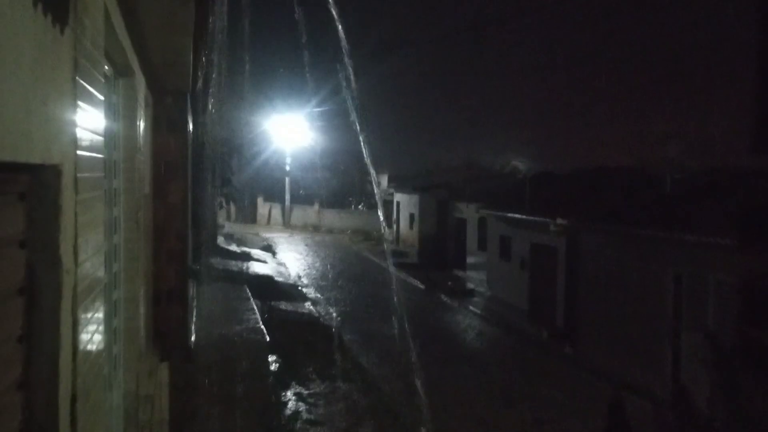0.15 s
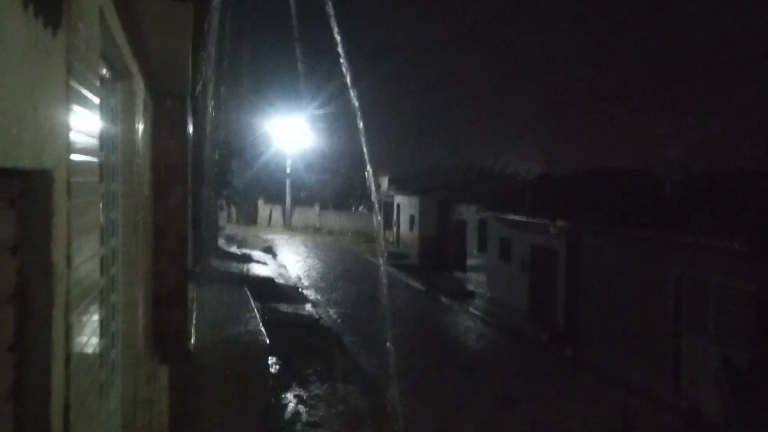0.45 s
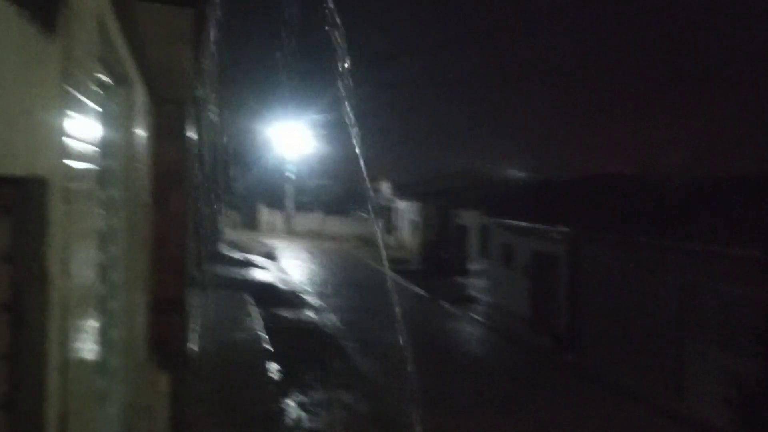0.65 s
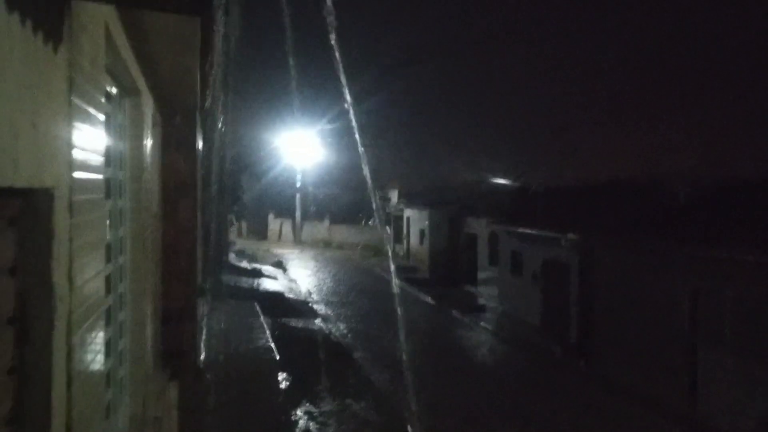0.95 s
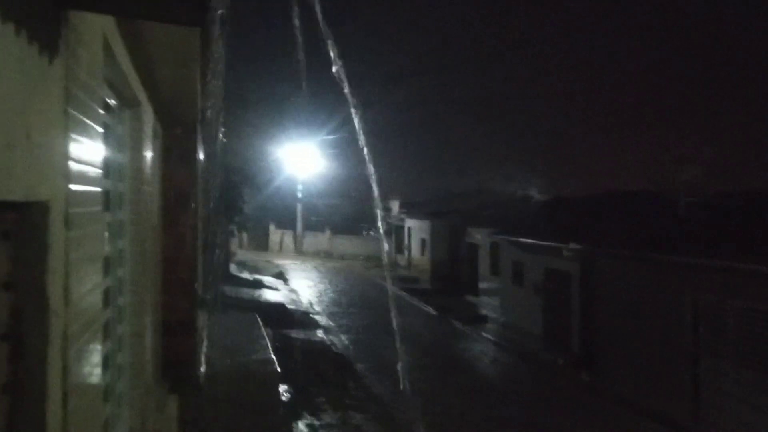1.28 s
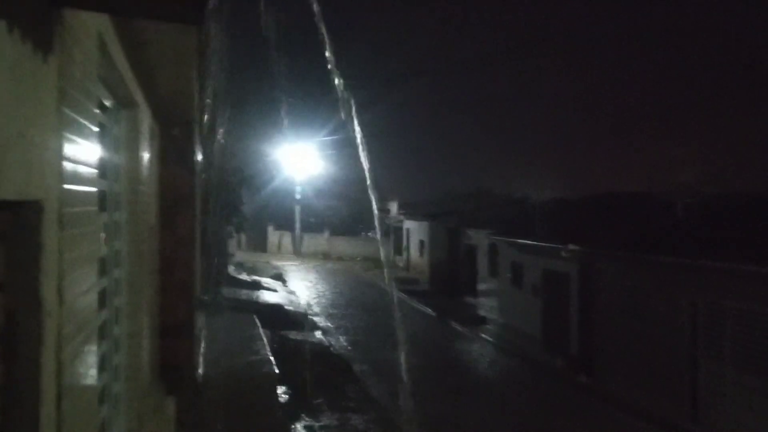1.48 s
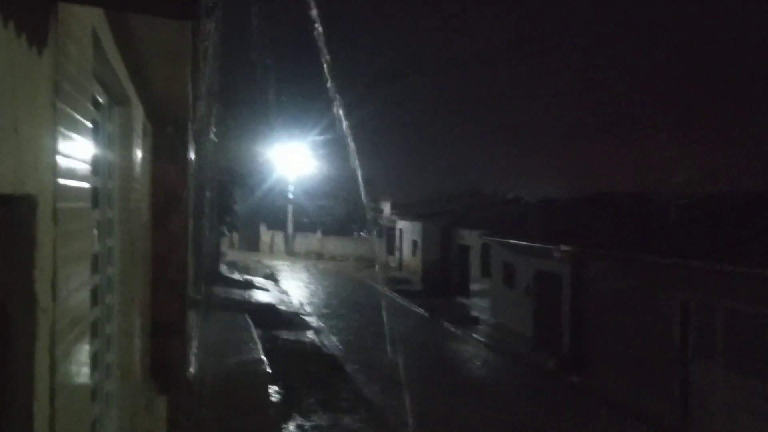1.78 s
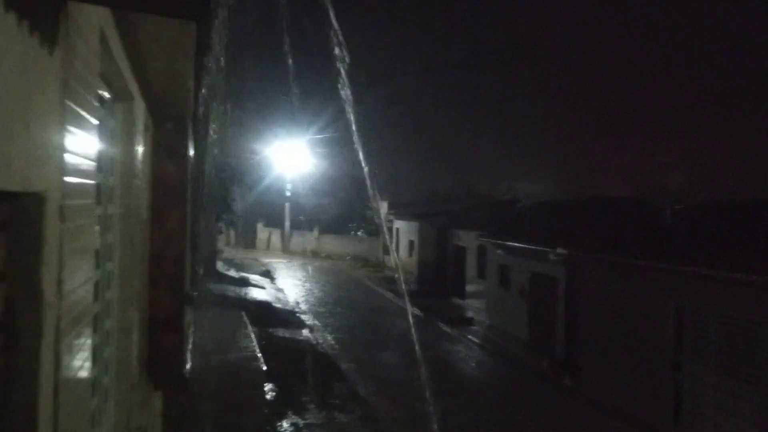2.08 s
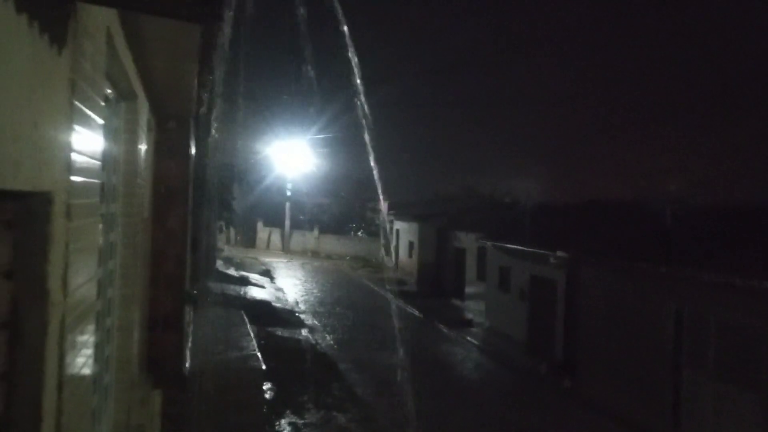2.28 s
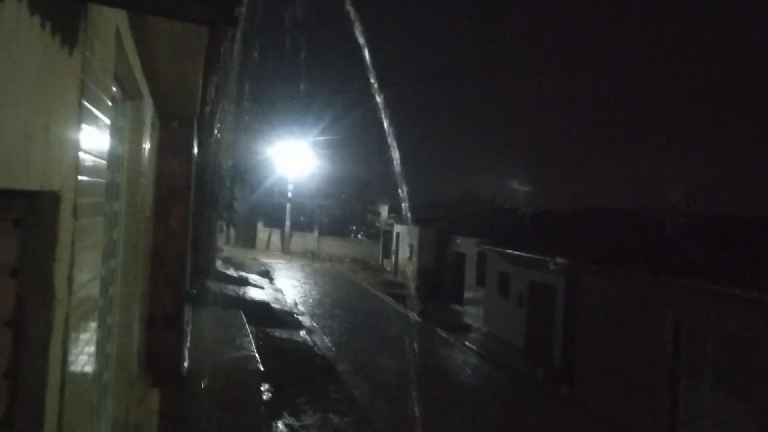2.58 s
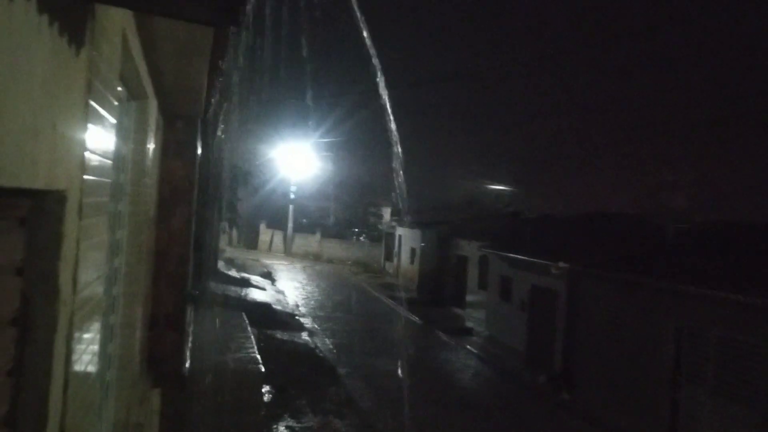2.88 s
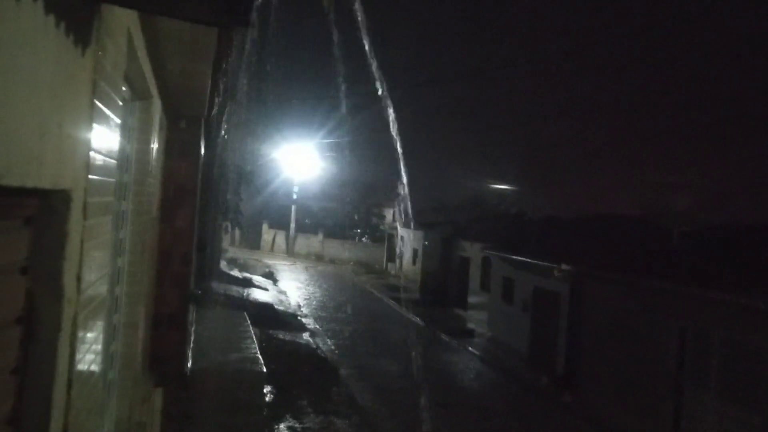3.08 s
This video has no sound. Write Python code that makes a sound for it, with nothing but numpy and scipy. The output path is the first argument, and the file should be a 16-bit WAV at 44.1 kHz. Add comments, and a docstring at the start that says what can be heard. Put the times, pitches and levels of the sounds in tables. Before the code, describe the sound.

Steady heavy rain falls on a street, heard from under a roof edge where runoff spatters on the pavement. Then wind buffets the microphone, stray drops click on its housing, and a thin stream hisses faintly.

```python
"""A paved street at night in heavy rain, the microphone under the edge of a roof.
Far drops merge into a wash and nearer ones patter and ping. Close by, water pours off the eaves
and bursts into spray; one stream lands with a slowly rising hiss. After a second, gusts buffet
the microphone and blow single drops against its housing."""
import sys
import numpy as np
from scipy import signal
from scipy.fft import rfft, irfft, next_fast_len
from scipy.io import wavfile
from scipy.ndimage import uniform_filter1d, map_coordinates

SR = 44100
rng = np.random.default_rng(int(sys.argv[2]) if len(sys.argv) > 2 else 0)


def transcribe(u):
    """Save the signal u as a 16-bit wav file named by the first command-line argument.

    u: samples, shape (n,) or (channels, n), limited to [-1, 1]; the rate is SR.
    q: integer samples, one column per channel.
    """
    v = np.clip(np.atleast_2d(u).T, -1, 1)
    q = np.round(v * 32767).astype(np.int16)
    wavfile.write(sys.argv[1], SR, q)


N = 143325

# Colour of the far wash: freq_hz, level_db
WASH_SPECTRUM = [(60, -19), (200, -10), (350, -7), (550, -2), (800, 2), (1700, 0.7), (2400, -2.5),
                 (3300, -3), (4400, 0), (5500, -2), (8500, -3.5), (15500, -7)]
# Swell of the rain in the street, far and near together: time_s, level_db
RAIN_LEVEL = [(.27, -45), (.45, -41.5), (.8, -41.5), (1.5, -40.5), (1.95, -41.5), (2.45, -41.5),
              (3.25, -43)]
# Low murmur of rain on the roofs: freq_hz, level_db
ROOFS, ROOFS_DB = [(25, -11), (62, -3.5), (100, -12), (160, -15.5), (300, -17.5), (600, -31.5)], -52.5

def rain():
    """Far drops merge into a wash, nearer ones patter on top, and the roofs murmur underneath."""
    wash = coloured(patchy(depth_db=1.5), WASH_SPECTRUM)
    drops = patter(count=2000, centre_hz=2730, spread=0.571, ring_cycles=9.6, scatter_db=3)
    spatter = patter(count=8000, centre_hz=8130, spread=0.32, ring_cycles=18, scatter_db=6)
    ticks = patter(count=170, centre_hz=6500, spread=0.25, ring_cycles=9, scatter_db=1.5)
    clumps = amp(2 * np.minimum(wobble(60), 1.5))
    flurries = amp(1.2 * wobble(25))
    near = amp(-15.5) * flurries * drops + amp(-9) * clumps * spatter + amp(-16) * ticks
    swell = amp(curve(RAIN_LEVEL) + 0.17 * wobble(6.11))
    roofs = amp(ROOFS_DB) * coloured(rng.standard_normal(N), ROOFS)
    return swell * (amp(-2.5) * wash + near) + roofs


def patter(count, centre_hz, spread, ring_cycles, scatter_db):
    """Near droplets land at random, each a damped ring that falls 60 dB in ring_cycles."""
    starts = (rng.random(count) * N).astype(int)[:, None]
    sizes = np.minimum(rng.exponential(size=count), np.log(60))[:, None]
    detune = spread * np.clip(rng.standard_normal(count), -2, 2)
    pitch_hz = np.clip(centre_hz * np.exp(detune), 400, 18000)[:, None]
    samples = np.arange(256)
    cycles = pitch_hz * samples / SR
    envelope = (1 - np.exp(-cycles / 2)) * amp(-60 * cycles / ring_cycles)
    rings = amp(scatter_db * sizes) * np.sqrt(pitch_hz) * envelope * np.sin(2 * np.pi * cycles)
    return unit(np.bincount((starts + samples).ravel(), rings.ravel(), N)[:N])


# Runoff hitting the pavement close by: start_s, level_db, centre_hz, width_octaves, t60_s
EAVES_SPLASHES = [(.3635, -26.5, 7450, 0.87, 0.037), (0.414, -26.5, 8650, 0.37, .05),
                  (.514, -27.5, 5300, 0.48, 0.048), (0.5409, -30.5, 6050, 0.76, 0.047),
                  (.712, -33.5, 2000, 2.2, 0.1), (0.9371, -30.5, 5800, 1.2, 0.031),
                  (0.957, -31, 9000, .45, 0.036), (1.147, -37.5, 3700, 1, 0.15),
                  (1.164, -31, 7250, 1.2, 0.029), (1.424, -33.5, 4160, 0.7, .12),
                  (1.514, -35, 4750, 1, 0.12), (1.565, -39, 4160, 0.31, 0.34),
                  (1.737, -34, 3140, 1.0, 0.23), (2.085, -34, 4300, 1.1, 0.11),
                  (2.114, -33.5, 3850, 2.2, 0.17), (2.244, -35.5, 3670, 0.39, .057),
                  (2.282, -33, 3680, 0.28, 0.056), (2.301, -28.5, 2600, 1.1, 0.037),
                  (2.32, -32, 2300, 2, 0.076), (2.528, -30, 6500, .6, 0.024), (2.688, -33, 4000, 0.88, 0.2),
                  (2.899, -30, 4160, 0.35, 0.14), (2.975, -35, 6950, .65, 0.17),
                  (3.089, -31, 4630, 1.4, 0.15), (3.163, -34.5, 5140, .6, 0.056)]

def splashes():
    """Each gulp of water from the eaves bursts into a quickly thinning spray."""
    out, t = np.zeros(N), np.arange(SR // 4) / SR
    for start_s, level_db, centre_hz, width_octaves, t60_s in EAVES_SPLASHES:
        fizz, sizes = rng.standard_normal((2, len(t)))
        droplets = fizz * np.exp(0.3 * np.repeat(sizes, 25)[:len(t)])  # uneven 25-sample grains
        colour = lambda f: octave_peak(f, centre_hz, width_octaves) / np.hypot(1, (f / 9500) ** 2)
        spray = unit(filtered(droplets, colour))
        rise = 1 - np.exp(-t / (0.046 * t60_s))
        add(out, start_s, amp(level_db - 60 * t / t60_s) * rise * spray)
    return out


# Single drops near the microphone: start_s, level_db, pitch_hz, t60_s
NEAR_DROPS = [(.3175, -33.5, 3100, 0.0046), (.3655, -25.5, 5600, 0.0056), (.4225, -29, 8550, .003),
              (.5172, -26, 4330, 0.0091), (.6998, -18, 5560, .006), (.9405, -27.5, 5400, 0.0057),
              (1.169, -24.5, 7460, 0.0056), (1.6755, -33, 4150, 0.0067), (1.7892, -25, 2560, 0.0067),
              (2.2488, -25.5, 3540, 0.0056), (2.3025, -15, 2960, 0.0024), (2.528, -32, 3760, 0.0043)]

def pings(snap_db=-9, snap_t60_s=0.0088):
    """Single drops land with a wet snap around their pitch and ring briefly."""
    out, t = np.zeros(N), np.arange(SR // 50) / SR
    for start_s, level_db, pitch_hz, t60_s in NEAR_DROPS:
        colour = lambda f: octave_peak(f, pitch_hz, width_octaves=1) / (1 + (f / pitch_hz / 2) ** 2)
        fizz = unit(filtered(rng.standard_normal(len(t)), colour))
        snap = amp(snap_db - 60 * t / snap_t60_s) * fizz
        ring = amp(-60 * t / t60_s) * np.sin(2 * np.pi * pitch_hz * t)
        add(out, start_s, amp(level_db) * (ring + snap))
    return out


# Gusts on the microphone: time_s, level_db
GUST_LEVEL = [(1.2, -87.5), (1.29, -43), (1.48, -45), (1.55, -37), (1.8, -35), (1.85, -34), (1.93, -43.5),
              (2.02, -37.5), (2.16, -37.5), (2.28, -40), (2.38, -43.5), (2.5, -39), (2.58, -38.5),
              (2.78, -38), (2.93, -33.5), (3.05, -44), (3.25, -38)]
# Colour of their rumble: freq_hz, level_db
GUST_SPECTRUM = [(15, 7.5), (35, 0), (70, -4.5), (130, -12.5), (260, -18.5), (500, -24.5), (1000, -25),
                 (3000, -65)]
# Puffs that thump the diaphragm: start_s, peak_db, rise_ms
DIAPHRAGM_PUFFS = [(1.271, -28, 2.3), (1.3335, -29.5, 3.5), (1.572, -20.5, 0.34), (1.599, -15, 2.5),
                   (1.599, -20, 0.63), (1.832, -25, 1.9), (2.03, -31.5, 0.4), (2.134, -30, 1.04),
                   (2.214, -28.5, 0.29), (2.5615, -23, 1.4), (2.682, -26.5, 0.62), (2.743, -24.5, 1.9),
                   (2.88, -18, 4.1), (2.897, -21, 0.73), (2.912, -23.5, 2.4), (2.986, -30, 1.4)]

def wind():
    """Gusts rumble on the microphone; single puffs push the diaphragm in and let it swing back."""
    lumps = amp(2 * wobble(45))
    rumble = coloured(rng.standard_normal(N), GUST_SPECTRUM)
    out = amp(curve(GUST_LEVEL)) * unit(rumble * lumps)
    t = np.arange(SR // 8) / SR
    for start_s, peak_db, rise_ms in DIAPHRAGM_PUFFS:
        progress = t * 1000 / rise_ms
        push = progress ** 2 * (1 - progress / 4) * np.exp(-1.4 * progress)
        add(out, start_s, amp(peak_db) * push / push.max())
    return out


# How the microphone housing answers a blow: freq_hz, gain_db
HOUSING_RESPONSE = [(2500, -3.5), (3400, -4), (4150, 3), (4550, 1), (5000, -6), (5900, -11.5),
                    (7800, -14.5), (9000, -21), (15000, -20)]
# Drops blown against it: start_s, strength_db, low_cut_hz, high_cut_hz, muffled_fraction
HOUSING_DROPS = [(1.3334, 6, 2300, 6500, 0.27), (1.5718, 9, 4900, 6000, 0), (1.6882, 13, 590, 6000, 0.3),
                 (1.7344, 13.5, 3800, 5600, 0.08), (1.745, 5, 100, 1980, 0), (1.7641, 7.5, 51, 2960, 0.4),
                 (2.1194, 0, 2300, 9000, 0), (2.5876, 4.5, 40, 860, .1), (2.62, 4, 36, 890, .1),
                 (2.6825, 5.5, 54, 2200, 0.2), (2.7930, 15, 24, 3120, 1)]

def housing_strikes(ring_hz=4220, ring_width_hz=1100):
    """A drop on the housing gives one sharp crack; with the ring muffled it only knocks."""
    out, blow = np.zeros(N), response(HOUSING_RESPONSE)
    ring = lambda f: 1j * f * ring_width_hz / (ring_hz ** 2 - f ** 2 + 1j * f * ring_width_hz)
    for start_s, strength_db, low_cut_hz, high_cut_hz, muffled_fraction in HOUSING_DROPS:
        highpass = lambda f: 1j * f / (low_cut_hz + 1j * f)
        lowpass = lambda f: 1 / (1 - (f / high_cut_hz) ** 2 + 1j * np.sqrt(2) * f / high_cut_hz)
        crack = filtered(blow, lambda f: highpass(f) * lowpass(f))
        damped = filtered(crack, lambda f: 1 - muffled_fraction * ring(f))
        add(out, start_s, amp(strength_db) * damped)
    return out


# One stream off the roof, landing close by: time_s, level_db
STREAM_LEVEL = [(2.29, -71), (2.34, -51), (2.6, -50.5), (2.85, -47), (3.12, -47.5), (3.25, -50)]

def stream(climb_start_s=2.31, settle_s=0.28, first_hz=1485, last_hz=2391, half_width_hz=560):
    """The stream lands with a broad, sputtering hiss whose pitch climbs and settles."""
    age_s = np.maximum(np.arange(N) / SR - climb_start_s, 0)
    centre_hz = last_hz + (first_hz - last_hz) * np.exp(-age_s / settle_s)
    phase = 2 * np.pi * np.cumsum(centre_hz) / SR
    lowpass = lambda f: 1 / np.hypot(1, (f / half_width_hz) ** 2)
    noise_a, noise_b = [filtered(rng.standard_normal(N), lowpass) for _ in range(2)]
    hiss = noise_a * np.cos(phase) + noise_b * np.sin(phase)  # a band around the moving centre
    sputter = amp(2 * wobble(140))
    return amp(curve(STREAM_LEVEL)) * unit(sputter * hiss)


def house_fronts(sound, t60_s=0.18, tail_db=-13):
    """The house fronts along the street reflect a short, weak tail."""
    t = np.arange(SR // 3) / SR
    tail = rng.standard_normal(len(t)) * amp(-60 * t / t60_s)
    return sound + amp(tail_db) * signal.fftconvolve(sound, tail / np.linalg.norm(tail))[:N]


def amp(db):
    return 10 ** (np.asarray(db) / 20)


def unit(x):
    return x / np.sqrt(np.mean(x ** 2) + 1e-20)


def curve(rows):
    """One value per sample from (time_s, value) rows."""
    return np.interp(np.arange(N) / SR, *np.transpose(rows))


def wobble(knots_per_s):
    """A smooth random curve."""
    return map_coordinates(rng.standard_normal(400), [np.arange(N) * knots_per_s / SR], mode="mirror")


def octave_peak(freq_hz, centre_hz, width_octaves):
    """A gain peak that halves width_octaves either side of its centre."""
    return 1 / (1 + (np.log2((freq_hz + 1) / centre_hz) / width_octaves) ** 2)


def spectrum_gain(freq_hz, spectrum):
    """Gain between (freq_hz, level_db) rows, on a log frequency axis."""
    knots_hz, level_db = np.transpose(spectrum)
    return amp(np.interp(np.log(freq_hz + 1), np.log(knots_hz + 1), level_db))


def filtered(x, gain):
    """x through a gain given as a function of frequency."""
    size = next_fast_len(len(x) + 8192)
    return irfft(rfft(x, size) * gain(np.fft.rfftfreq(size, 1 / SR)), size)[:len(x)]


def coloured(x, spectrum):
    """x shaped by a spectrum, at rms 1."""
    return unit(filtered(x, lambda f: spectrum_gain(f, spectrum)))


def response(spectrum):
    """The minimum-phase impulse response of a spectrum."""
    cepstrum = irfft(np.log(spectrum_gain(np.fft.rfftfreq(2048, 1 / SR), spectrum)))
    half = len(cepstrum) // 2
    causal_fold = np.r_[1, np.full(half - 1, 2), 1, np.zeros(half - 1)]
    return irfft(np.exp(rfft(cepstrum * causal_fold)))


def patchy(depth_db):
    """White noise whose gain drifts in patches of time and frequency."""
    frames = signal.stft(rng.standard_normal(N), nperseg=512)[2]
    patches = uniform_filter1d(rng.standard_normal(frames.shape), size=9, axis=0)
    patches = uniform_filter1d(patches, size=10, axis=1)
    return signal.istft(frames * amp(depth_db * unit(patches)), nperseg=512)[1][:N]


def add(track, start_s, sound):
    """Mix a sound into the track."""
    start = int(np.clip(round(start_s * SR), 0, N))
    track[start:start + len(sound)] += sound[:N - start]


def scene():
    """Rain and runoff in the street; wind and stray drops right at the microphone, in mono."""
    street = rain() + house_fronts(splashes() + pings()) + stream()
    return (street + housing_strikes() + wind())[None]


# Colour of the microphone under the eaves: freq_hz, gain_db
MIC_RESPONSE = [(3200, 1.5), (4500, -1.4), (5400, -3.5), (8000, -8), (10000, -11.5), (15500, -16.5)]

def record(dry, open_s=0.272, settle_s=0.13, top_hz=15650):
    """The microphone opens with a soft, deep thump, dulls the treble and keeps nothing above top_hz."""
    age_s = np.maximum(np.arange(N) / SR - open_s, 0)
    fade_in = 1 - np.exp(-age_s / 0.00087)
    settling = age_s / settle_s
    thump = amp(-15) * settling * (settling / 3 - 1) * np.exp(-settling)
    heard = signal.fftconvolve(dry[0] * fade_in + thump, response(MIC_RESPONSE))[:N]
    return filtered(heard, lambda f: f < top_hz)[None]


dry = scene()
out = record(dry)
transcribe(out)
```